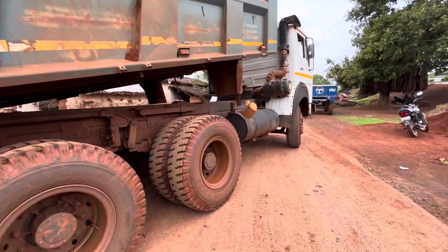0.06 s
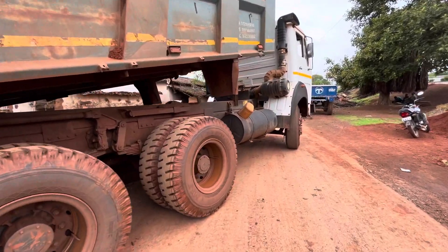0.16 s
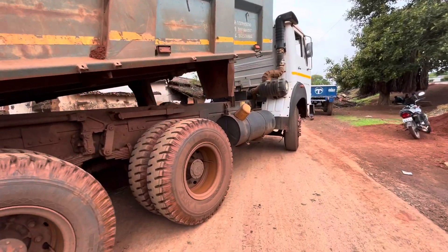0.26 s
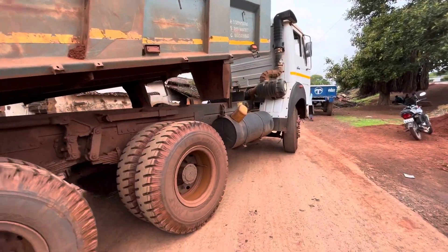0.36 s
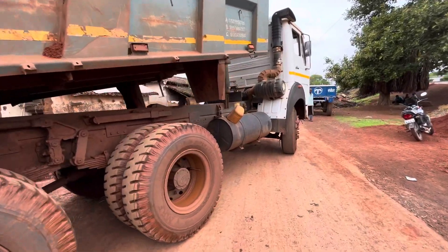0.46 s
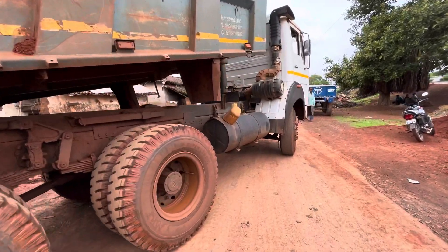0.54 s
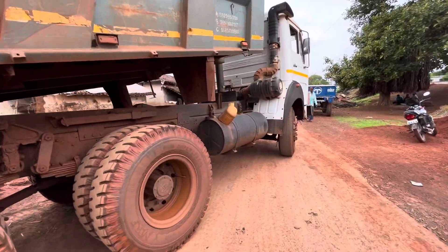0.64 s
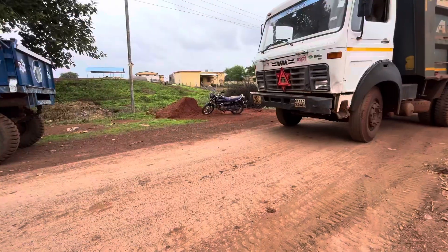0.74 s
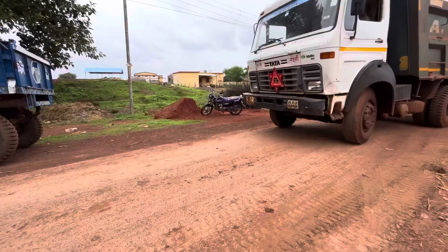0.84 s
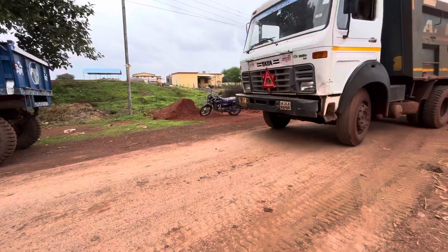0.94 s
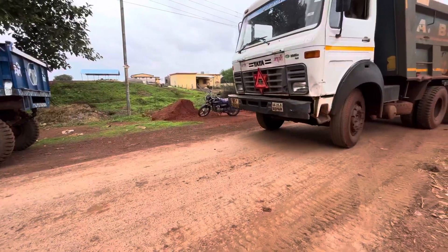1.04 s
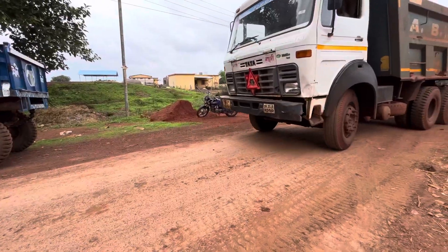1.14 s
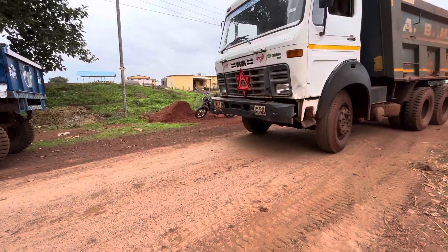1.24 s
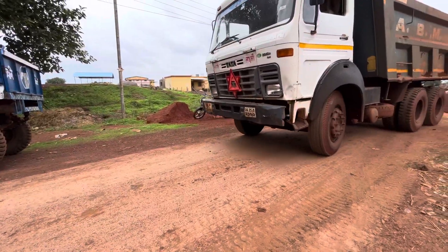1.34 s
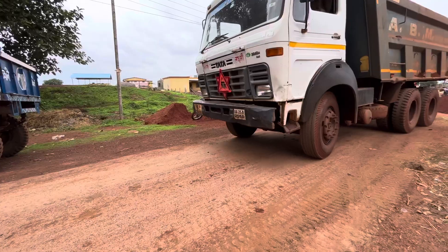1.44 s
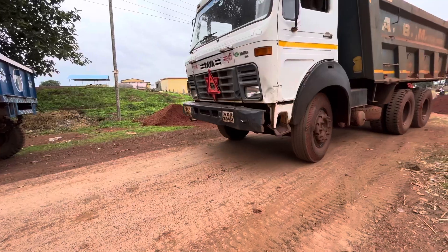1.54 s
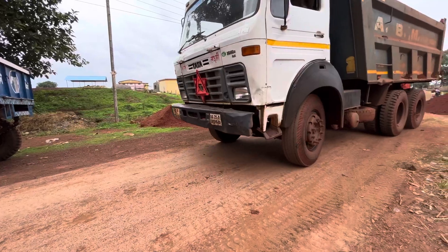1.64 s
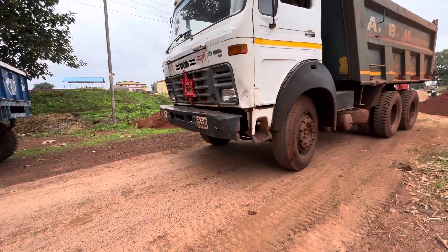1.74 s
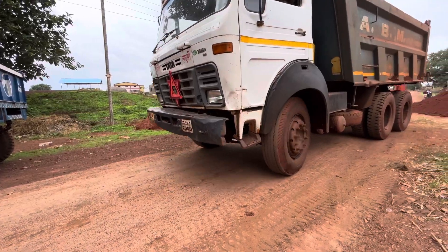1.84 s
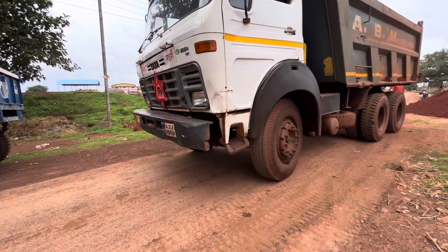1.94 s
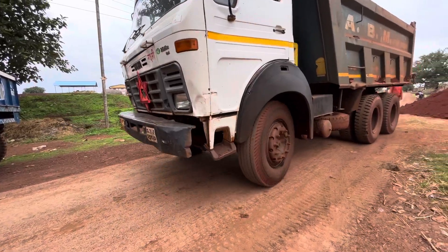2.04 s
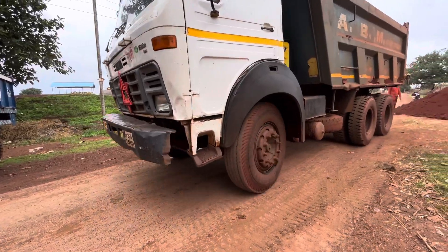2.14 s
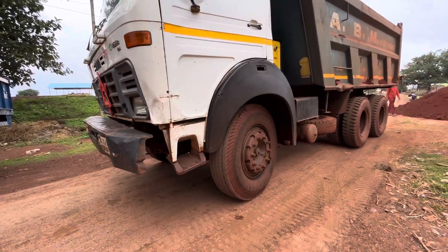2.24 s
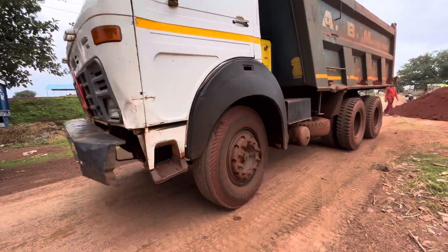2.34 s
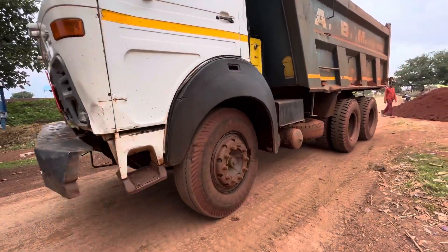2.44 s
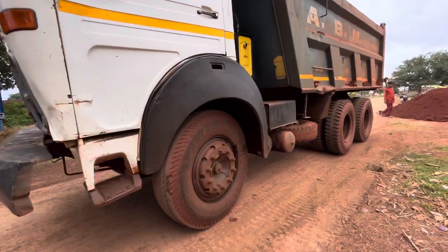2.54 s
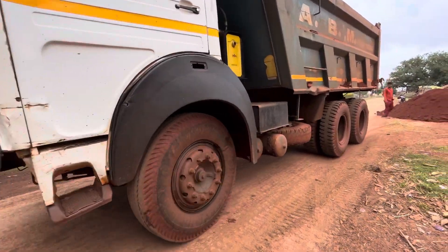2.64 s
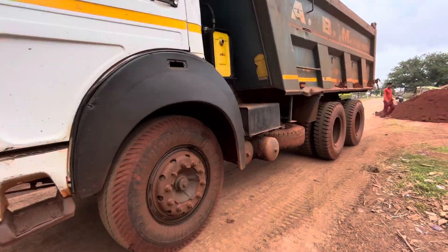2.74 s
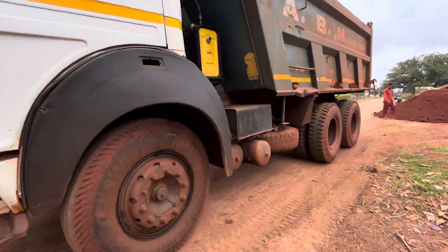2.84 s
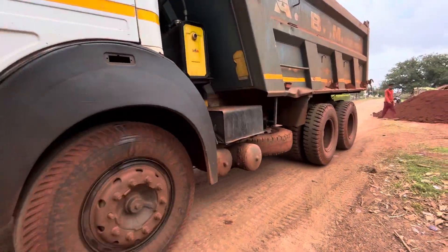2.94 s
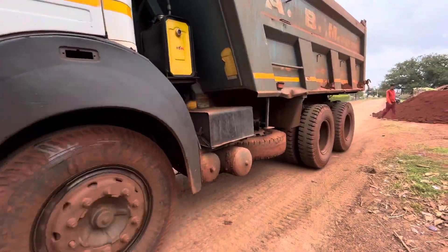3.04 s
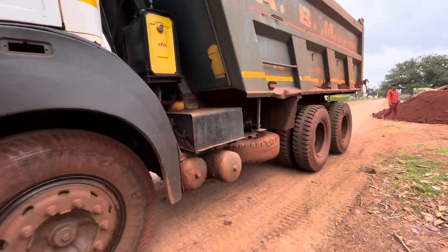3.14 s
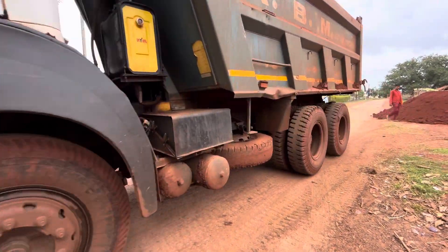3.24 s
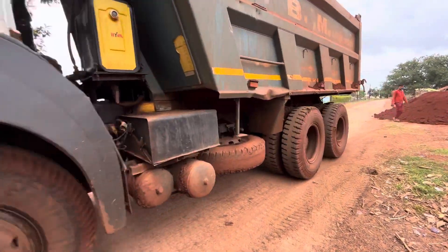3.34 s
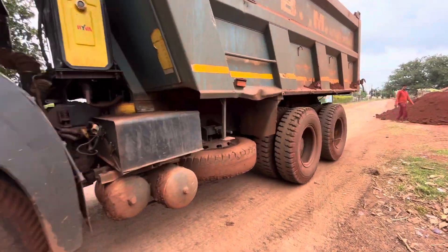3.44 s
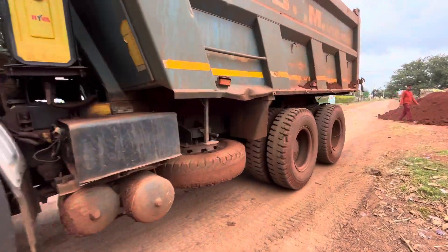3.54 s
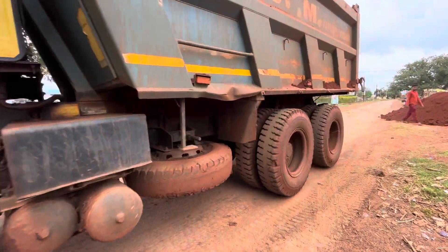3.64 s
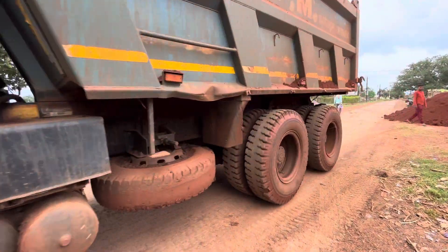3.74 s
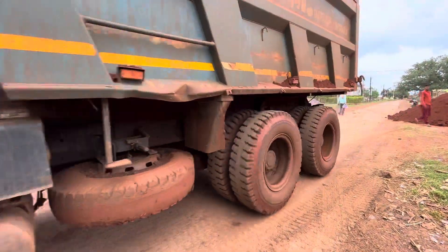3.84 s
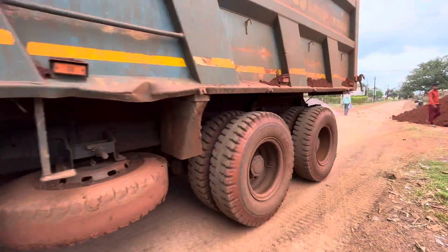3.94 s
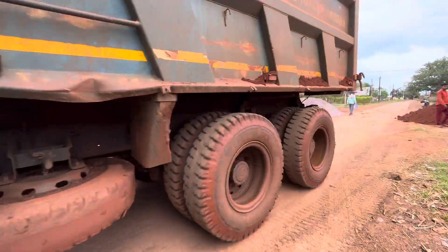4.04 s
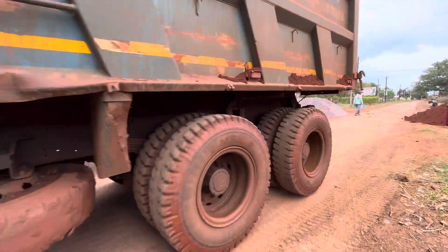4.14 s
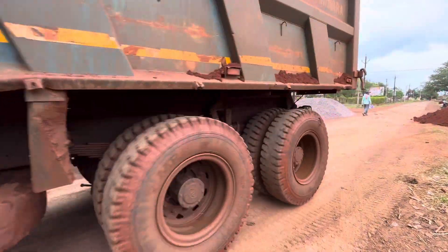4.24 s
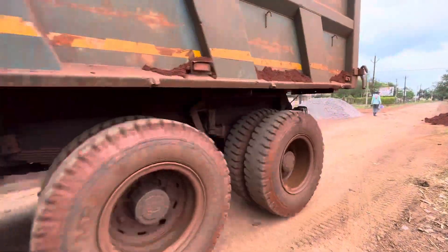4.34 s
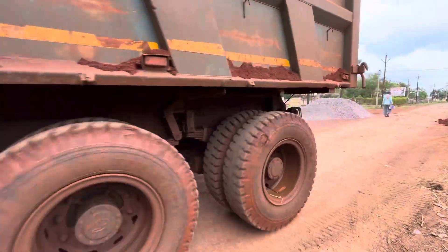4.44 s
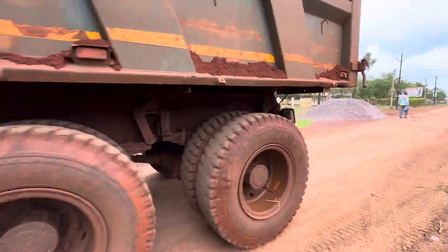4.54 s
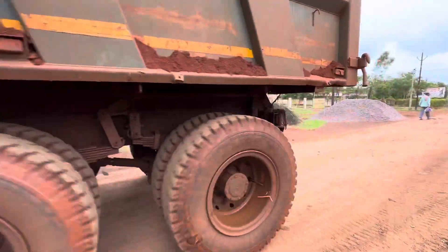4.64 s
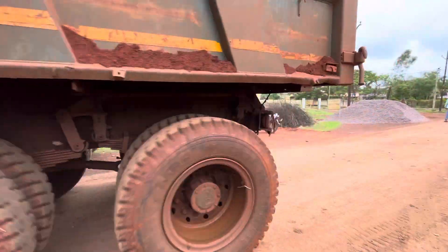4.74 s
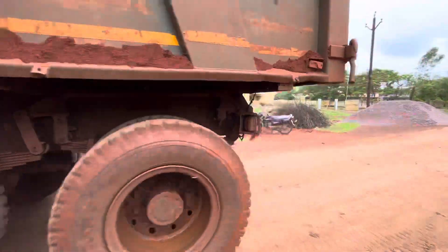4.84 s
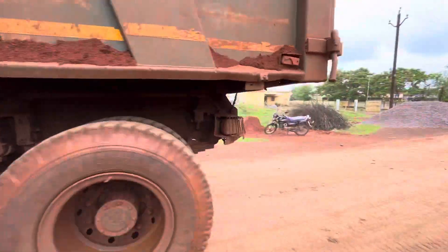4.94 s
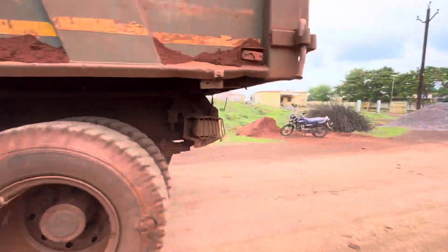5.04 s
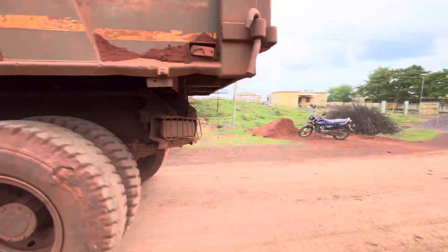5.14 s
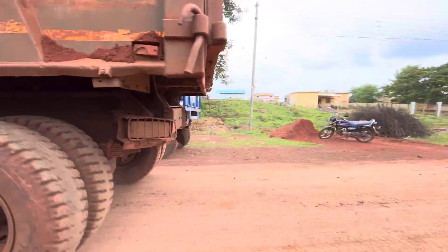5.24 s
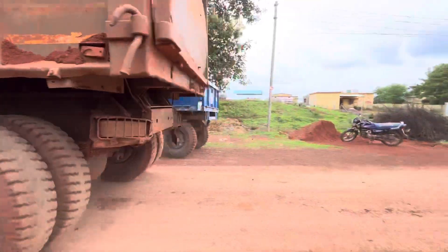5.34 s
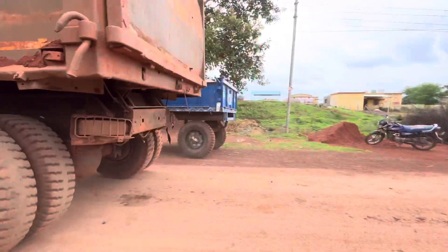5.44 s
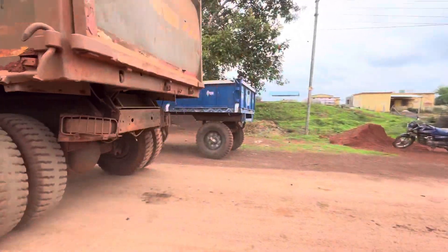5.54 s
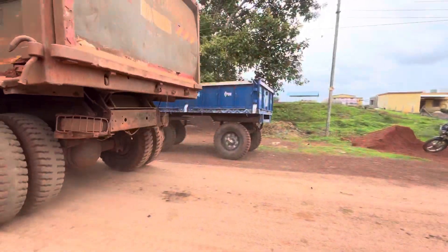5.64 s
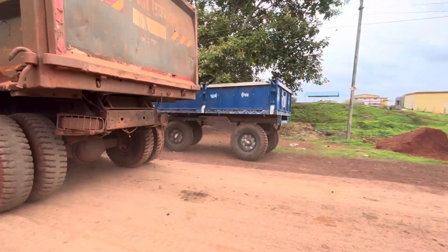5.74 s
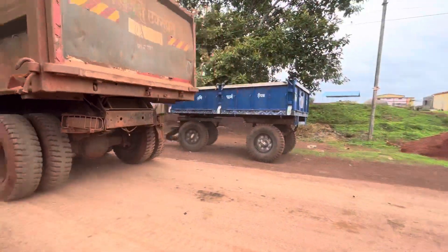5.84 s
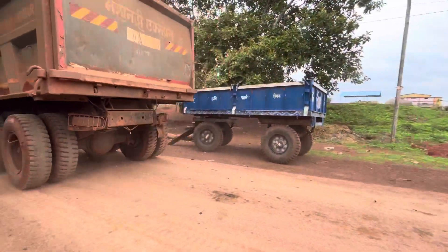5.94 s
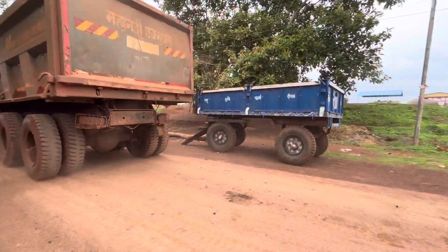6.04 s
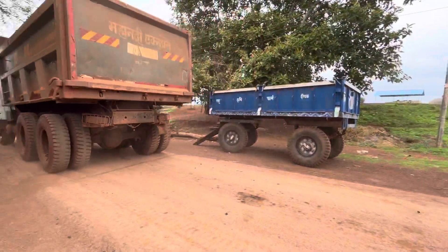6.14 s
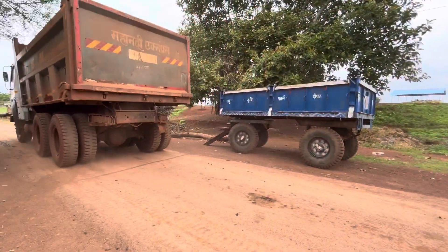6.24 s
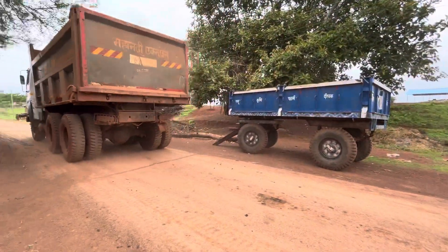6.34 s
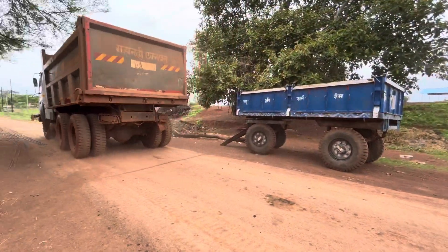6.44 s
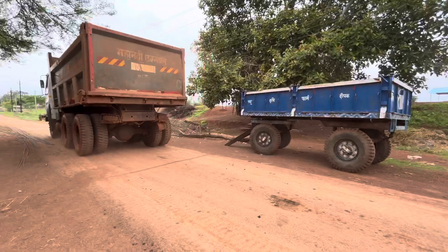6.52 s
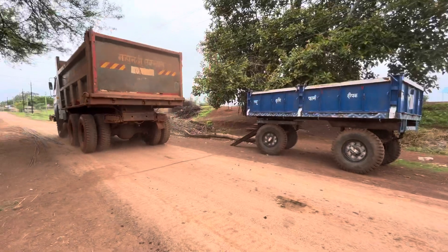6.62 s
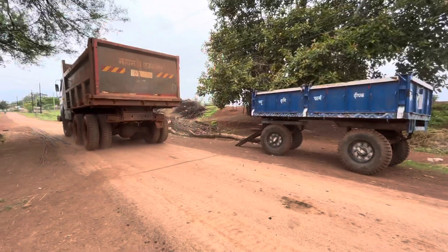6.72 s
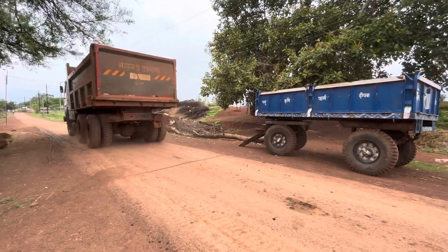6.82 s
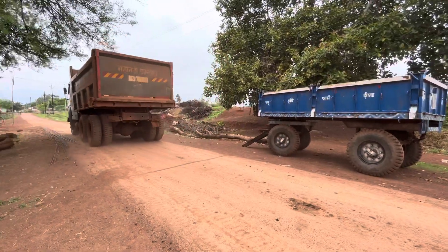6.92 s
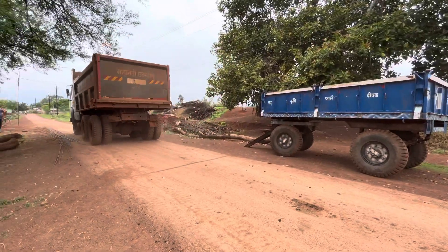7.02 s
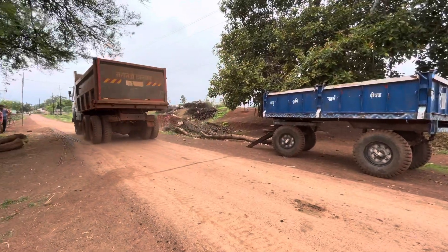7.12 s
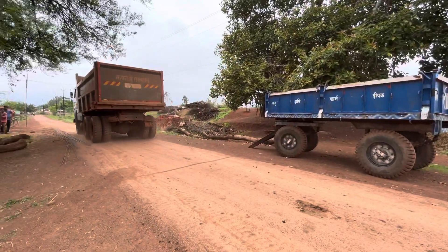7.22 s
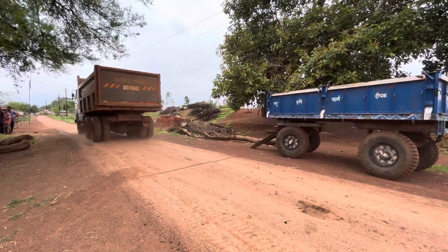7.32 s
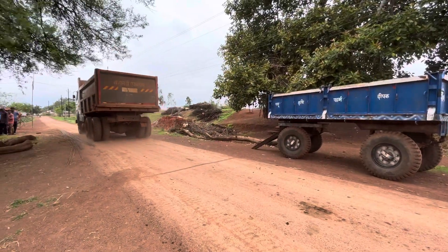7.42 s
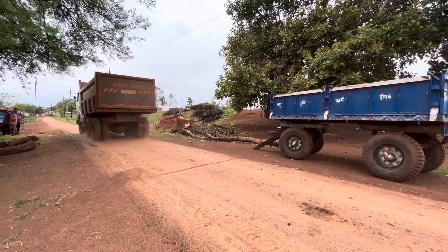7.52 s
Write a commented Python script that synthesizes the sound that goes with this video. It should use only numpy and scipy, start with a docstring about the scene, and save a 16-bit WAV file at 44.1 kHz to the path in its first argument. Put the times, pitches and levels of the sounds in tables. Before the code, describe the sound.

A close outdoor stereo microphone on a dirt road hears a heavy diesel truck. From 0 to 0.7 s it rolls away with throbbing low exhaust, muted clatter, soft compressor chuffs and a couple of dull thumps. At 0.7 s an abrupt cut: higher revs, quickly easing into a coasting run-down, with chattering gear whine, injector rasp and, around 1.5-2 s, a faint airy turbo whistle. Clatter grows as the pitch sinks until about 3 s; soft thumps near 2.5-2.8 s and a thin air hiss near 2.9 s. Throttle opens around 3.1 s, revs bottom near 3.6 s, then climb; from 3.5 to 4.3 s the open flank gives the loudest rough knocks, clanks, clatter and hiss. Bright hiss and deep exhaust boom peak at 4.3-5 s, with wind buffets and heavy dull thumps until 5.4 s. Then clatter drops away and a smoother droning exhaust recedes, pitch rising, to 7.6 s.

```python
"""Diesel dump truck passing on a dirt road

A six-cylinder truck rolls away; at 0.7 s the scene jumps to it approaching with the engine running down.
It then pulls past close by, revs rising, and recedes. Tones and pulsing noise make the exhaust, blows and
noise the clattering block, wavering tones the gear whine, shaped noise the hisses, rear tyres and wind.
Engine sounds follow one crankshaft; distance, revs, throttle and the side in view colour and level them."""
import sys
import numpy as np
from scipy.fft import rfft, irfft, next_fast_len
from scipy.io import wavfile
from scipy.ndimage import uniform_filter1d, map_coordinates

SR = 44100
rng = np.random.default_rng(int(sys.argv[2]) if len(sys.argv) > 2 else 0)


def dump_mix(stems):
    """Bounce the given channels to the path in sys.argv[1] as a 16-bit WAV at rate SR."""
    frames = np.atleast_2d(stems).T  # one column per channel
    limited = np.clip(frames, -1, 1)  # hard clip at full scale
    pcm = np.round(limited * 32767).astype(np.int16)
    wavfile.write(sys.argv[1], SR, pcm)


N = 334233

# engine speed: (time [s], firing rate [Hz])
FIRING_RATE = [(0, 60.1), (.69, 62.55), (.72, 93.5), (1.05, 100.2), (1.5, 88.74), (2, 76.08), (2.6, 61.69),
               (3.25, 51), (3.5, 41.81), (3.65, 39.42), (3.9, 45.03), (4.76, 58.27), (5.56, 63.59),
               (6.33, 70.23), (7.58, 84.93)]
# what each side lets out, front to tailgate; the flank is open:
# (block clatter [dB], injector rasp [dB], hiss [dB], knock [dB])
SIDE_LEVELS = [(-36.5, -35.5, -47.5, -45.5), (-34, -34.5, -45, -30), (-26, -26, -31, -33),
               (-36.5, -38.5, -45.5, -41), (-39.5, -44, -54, -45)]
# how the two ports differ in loudness: (frequency [Hz], left minus right [dB])
PORT_TILT = [(450, -10), (600, -0.5), (800, 5.5), (1300, 3.5), (2400, -2.5), (3600, 2), (5300, 8),
             (7000, -1.5), (9500, -6.5), (12000, 0.5)]
# right port behind the left, one entry for each side of the truck: lag [ms], before the bend below
PORT_LAG_MS = [0.0084, 0.21, 0.38, 0.39, 0.29]
# how that lag changes with pitch: (frequency [Hz], factor [1])
LAG_BEND = [(250, .2), (450, 3.5), (650, 2.02), (1000, 1.02), (2200, 0.7), (5000, 0.94), (6200, 0.96),
            (7000, 0)]
# colour of the combustion knock: (frequency [Hz], noise weight [dB])
KNOCK_COLOUR = [(500, -18), (780, -8.5), (1000, 1), (1150, 3), (1520, -2.5), (2000, -24), (3000, -16.5),
                (8000, -24), (14000, -70)]
# dull low thumps, levels before the thump and rattle gains: (time [s], boom [dB], rattle [dB])
LOW_THUMPS = [(.053, -12.5, -32), (.218, -17, -51), (2.49, -21, -54), (2.82, -17, -43), (4.95, -12, -48),
              (5.051, -21, -60), (5.186, -7, -35), (5.374, -14, -40), (5.417, -22, -36)]

CUT_S = .705  # the scene jumps back to the approach
SPEED_M_PER_S, SOUND_M_PER_S = 2.234, 343
ENGINE_PASS, OUTLET_PASS = (3.82, 1.99), (4.26, 1.59)  # closest approach: (time [s], distance [m])


def amp(db):
    """Turn decibels into gain."""
    return 10 ** (np.asarray(db) / 20)


def unit(x):
    """Scale x to an average (rms) strength of 1."""
    return x / np.sqrt(np.mean(x ** 2) + 1e-20)


def along(points, hz):
    """Read a curve of (Hz, value) points, with frequency on a log axis."""
    f, v = np.transpose(points)
    return np.interp(np.log(hz + 1), np.log(f + 1), v)


def clock():
    """Give the time of every sample in seconds."""
    return np.arange(N) / SR


def curves(rows):
    """Draw a line over time through each column after the time column."""
    s, *cols = np.transpose(rows)
    return [np.interp(clock(), s, c) for c in cols]


def wobble(rate):
    """Draw a smooth random curve with the given number of random points a second."""
    t = np.arange(0, N / SR + 1 / rate, .1 / rate)
    points = rng.standard_normal(int(N * rate / SR) + 4)
    return np.interp(clock(), t, map_coordinates(points, [t * rate]))


def swell(s, half):
    """Rise and fall like a bell around time s."""
    return np.exp(-.5 * np.minimum(((clock() - s) / half) ** 2, 100))


def eased(db):
    """Round off the steps of a level by averaging over 25 ms."""
    return uniform_filter1d(db, size=SR // 40)


def grid():
    """Give the frequencies of a spectrum padded with silence."""
    return np.fft.rfftfreq(next_fast_len(N + 8192, True) // 2 * 2, 1 / SR)


def filtered(x, response):
    """Multiply the spectrum of x by a response given on the grid."""
    m = 2 * (len(grid()) - 1)
    return irfft(rfft(x, m) * response, m)[..., :N]


def delayed(x, delay_s):
    """Hear x late by a changing delay."""
    return np.array([np.interp(clock() - delay_s, clock(), channel) for channel in x])


def pan(left_db):
    """Share a left-right difference in level between the two ports."""
    return amp(np.outer([.5, -.5], left_db))


def lift_db(modes, hz):
    """Add up how much a set of resonances raises each frequency."""
    return sum(db / (1 + (2 * (hz - centre) / width) ** 2) for centre, width, db in modes)


def opening():
    """Give 1 before the jump and 0 after it."""
    return 1.0 * (clock() < CUT_S)


def emerging_db():
    """Before the jump the engine grows louder as it clears the rear wheels."""
    rise_db_per_s = 7.5
    return rise_db_per_s * (clock() - CUT_S / 2)


def pass_time():
    """Tell how far along its pass the truck is, in seconds."""
    ahead_s = 5.06  # before the jump the truck is this much further along
    return clock() + ahead_s * opening()


def distance(closest):
    """Give the metres to a part of the truck as it rolls by in a straight line."""
    s, metres = closest
    return np.hypot(metres, SPEED_M_PER_S * (pass_time() - s))


def facing():
    """Tell which side of the truck is turned to the microphones."""
    # (time along the pass [s], side [0 front, 1 cab corner, 2 flank, 3 rear wheels, 4 tailgate])
    side_points = [(.72, 0), (2.3, 1), (3.3, 0.99), (3.5, 2), (3.97, 2), (4.9, 3), (5.8, 3.5), (6.5, 4)]
    return np.clip(np.interp(pass_time(), *np.transpose(side_points)), 0, len(SIDE_LEVELS) - 1)


def throttle():
    """Give 0 while the engine coasts and near 1 while it pulls."""
    # pedal: (time [s], opening [0 coasting to 1 pulling])
    pedal = [(.78, 1), (.95, 0.16), (3.07, 0), (3.12, 0.97)]
    return np.clip(curves(pedal)[0], 0, 1)


def carry_db(closest):
    """A part of the engine is louder the nearer it is and the faster it turns."""
    rev_db_per_octave = 12.5
    octaves = np.log2(curves(FIRING_RATE)[0] / 60)
    return rev_db_per_octave * octaves + 20 * np.log10(closest[1] / distance(closest))


def machinery_db():
    """Set clatter, rasp, hiss and knock levels from distance, revs, throttle and the side in view."""
    # change before the jump, one entry each for clatter, rasp, hiss and knock: level [dB]
    opening_levels = (-7, -7.5, -10, -16)
    load_db = 3  # extra with the throttle open
    shared, side = carry_db(ENGINE_PASS) + load_db * throttle(), facing()
    levels = []
    for by_side, db in zip(np.transpose(SIDE_LEVELS), opening_levels):
        side_db = np.interp(side, np.arange(len(by_side)), by_side)
        levels.append(eased(shared + side_db + (db + emerging_db()) * opening()))
    return levels


def underbody(echo=0.53, decay_s=0.0094, dull_hz=6000):
    """Quick echoes between dirt road, frame and panels ripple the response; they weaken in the treble."""
    hz, t = grid(), np.arange(SR // 20) / SR
    tail = rng.standard_normal(len(t)) * np.exp(-t / decay_s)
    depth = echo / (1 + (hz / dull_hz) ** 2)
    return (1 + depth * rfft(tail / np.linalg.norm(tail), 2 * (len(hz) - 1))) / np.hypot(1, depth)


def ports(direct, lag_ms):
    """Two ports hear the direct sound with a lag, and scattered sound that is unrelated between them."""
    # (frequency [Hz], left-right likeness [0-1])
    likeness = [(500, 1), (1000, 0.46), (2500, 0.39), (5000, 0.16), (14000, 0.13)]
    hz = grid()
    gain = pan(along(PORT_TILT, hz))
    lead = 2 * np.pi * hz * lag_ms / 1000 * along(LAG_BEND, hz)
    path = gain * np.exp(1j * np.outer([.5, -.5], lead))
    alike = np.clip(along(likeness, hz), .3, .85)
    # strength of the two ports' average, divided out to keep the colour even
    middle = np.sqrt(alike * abs(path.mean(0)) ** 2 + (1 - alike) * (gain ** 2).mean(0) / 2)
    scattered = rfft(rng.standard_normal((2, N)), 2 * (len(hz) - 1))
    both = direct * path * np.sqrt(alike) + scattered * gain * np.sqrt(1 - alike)
    return underbody() * both / middle


def wind(lumps_db=3, eddy_db=4.5, eddies_per_s=9):
    """Strong gusts and the truck's eddying wake buffet each port with low noise of its own."""
    # strongest gusts: (time [s], level before lumps and left-right gains [dB], half length [s])
    gusts = [(0.62, -30, 0.051), (0.835, -31, 0.037), (2.474, -27, 0.063), (2.622, -30, 0.047),
             (2.745, -26.5, 0.14), (3.82, -24, 0.083), (4.847, -21, 0.069), (4.973, -19.5, 0.051),
             (5.202, -20, 0.086), (5.407, -22, 0.052), (5.58, -26.5, 0.073), (5.795, -25.5, 0.044),
             (5.987, -27, 0.061), (6.305, -31.5, 0.056)]
    # (frequency [Hz], noise weight [dB])
    wind_colour = [(20, -40), (50, 2), (110, 2), (200, -1.5), (330, -3.5), (480, -18.5), (900, -34.5),
                   (1500, -21), (2500, -68), (6000, -100)]
    wake_db, wake_s, wake_half_s = -30.5, 4.65, 0.96
    wake = amp(wake_db + eddy_db * wobble(eddies_per_s)) * swell(wake_s, wake_half_s)
    force = np.sqrt(wake ** 2 + sum((amp(db) * swell(s, half)) ** 2 for s, db, half in gusts))
    lumps = amp(lumps_db * np.array([wobble(45), wobble(45)]))
    noise = filtered(rng.standard_normal((2, N)), amp(along(wind_colour, grid())))
    return force * unit(lumps * noise) * amp([[2.5], [-.5]])


def high_hiss():
    """High hiss swells and fades: the fan behind the grille, then the rear tyres twice."""
    # (time [s], level [dB], half length [s], left minus right [dB])
    hiss_swells = [(2.3, -43.5, .25, 3), (4.55, -35, 0.3, -10), (5.97, -48.5, 0.25, 0)]
    # (frequency [Hz], noise weight [dB])
    hiss_colour = [(1000, -16), (2000, -6), (4500, 9), (6500, -5), (9000, -3), (14000, -21)]
    colour = amp(along(hiss_colour, grid())) * pan(along(PORT_TILT, grid()))
    noise = unit(filtered(rng.standard_normal((2, N)), colour))
    return sum(amp(db) * swell(s, half) * pan(left_db) for s, db, half, left_db in hiss_swells) * noise


def thumps(level_db=-2, delay_s=0.00396):
    """Dull low thumps, from wind buffets or the body: single blows ring a few resonances."""
    # resonances of a thump: (frequency [Hz], width [Hz], weight [dB])
    thump_modes = [(222, 90, -2), (344, 76, -7), (697, 15, -35), (1000, 66, -17), (1170, 45, -21)]
    hz, blows, tone = grid(), np.zeros(N), 0
    for k, (centre, width, db) in enumerate(thump_modes):
        damping = 1j * hz * width
        tone = tone + (-1) ** k * amp(db) * damping / (centre * centre - hz * hz + damping)
    for s, db, _ in LOW_THUMPS:
        blows[round((s + delay_s) * SR)] = amp(db + level_db)
    soft = tone / (1 + 1j * hz / 900) ** 2
    return filtered(blows, soft / abs(irfft(soft)).max())


def rattles(rough_db=3.0, left_db=3):
    """A dull rattle of rough noise starts just before each thump and dies away."""
    # (frequency [Hz], noise weight [dB])
    rattle_colour = [(150, -20), (330, 9), (600, -1), (900, -3), (1500, -10.5), (2200, -16), (8000, -49)]
    lead_s, attack_s, decay_s = 0.029, 0.007, 0.055
    level = np.zeros(N)
    for s, _, db in LOW_THUMPS:
        age = np.maximum(clock() - s + lead_s, 0)
        level += amp(db) * (1 - np.exp(-age / attack_s)) * np.exp(-age / decay_s)
    shake = rng.standard_normal(N) + .5 * rng.standard_normal((2, N))
    clatter = unit(filtered(shake * amp(rough_db * wobble(120)), amp(along(rattle_colour, grid()))))
    return 2 * level * clatter * amp([[left_db / 2], [-left_db / 2]])


def air(chuff_hz=2450):
    """The air compressor chuffs softly early on, and an air valve gives short thin hisses, all from noise."""
    # compressor strokes: (time [s], level before an 8 dB cut [dB])
    chuff_strokes = [(0.1794, -36), (0.2828, -36), (0.3825, -34), (0.4944, -36), (0.5985, -32)]
    # air valve: (time [s], level [dB], half length [s])
    valve_hisses = [(2.94, -43, 0.044), (3.55, -45, .07)]
    hz = grid() + 1
    strokes = sum(amp(db - 8) * swell(s, .01) for s, db in chuff_strokes)
    chuff = unit(filtered(rng.standard_normal((2, N)), 1 / (1 + (4 * np.log(hz / chuff_hz)) ** 2)))
    thin = amp(along([(5000, -40.5), (9500, 20), (14000, 16)], hz))
    leak = unit(filtered(rng.standard_normal((2, N)), thin))
    return strokes * chuff + sum(amp(db) * swell(s, half) for s, db, half in valve_hisses) * leak


def turbo(blur_hz=420):
    """The turbocharger spins down with a faint whistle, made airy by random wavering."""
    # (time [s], pitch [Hz], level [dB])
    whistle = [(.72, 9400, -75), (1.1, 9400, -64), (1.45, 9300, -55), (1.85, 8897, -54), (2.1, 8500, -56),
               (2.5, 7900, -80)]
    hz, db = curves(whistle)
    phase = 2 * np.pi * np.cumsum(hz) / SR
    pair = [wobble(blur_hz) * np.sin(phase) + wobble(blur_hz) * np.cos(phase) for port in range(2)]
    return amp(db) * unit(np.array(pair))


def whine(cycles, stray=.45, stray_hz=40):
    """The meshing gear teeth sing as thin, unsteady lines that follow the revs."""
    # clear whines: (multiple of the firing rate [1], level relative to the whine's own [dB])
    mesh_lines = [(11.8, 0), (12.75, -4), (15.7, -7), (21.6, -5), (23.6, 0)]
    mesh_db, mesh_s, mesh_half_s = -44, 2.08, .42  # they carry as the grille draws near
    out = np.zeros((2, N))
    lag = np.array([[0], [PORT_LAG_MS[0] + PORT_LAG_MS[1]]]) / 2000 * curves(FIRING_RATE)[0]
    for order, db in mesh_lines:
        unsteady = 1 + stray * np.array([wobble(stray_hz) + 1j * wobble(stray_hz) for port in range(2)])
        out += amp(db) * unit((unsteady * np.exp(2j * np.pi * order * (cycles - lag))).real)
    return amp(mesh_db) * swell(mesh_s, mesh_half_s) * out


def gears(cycles, lower_order=11.7, upper_order=23.5, blur_hz=260, blur=1.0, spread=0.36):
    """Unloaded timing gears chatter with the engine cycle: fuzzy, stranded whines that follow the revs."""
    # (time [s], lower mesh level [dB], upper mesh level [dB])
    mesh_levels = [(.68, -72, -57), (.75, -42.5, -39), (1.1, -41, -39), (1.45, -60, -55), (1.85, -47, -40),
                   (2.2, -41, -45), (2.6, -47, -55), (3.1, -77, -43), (3.6, -72, -66)]
    out = np.zeros((2, N))
    for order, db in zip((lower_order, upper_order), curves(mesh_levels)):
        pattern = rng.standard_normal(size=14) + 1j * rng.standard_normal(size=14)
        # the same pattern comes round every six firings
        backlash = np.interp(cycles / 6, np.arange(len(pattern)) / len(pattern), pattern, period=1)
        chatter = backlash + blur * wobble(blur_hz) + spread * 1j * np.outer([1, -1], wobble(blur_hz))
        out += amp(db) * unit((chatter * np.exp(2j * np.pi * order * cycles)).real)
    return out


def growl(cycles, throb=0.49, left_db=2):
    """Low noise in narrow bands, throbbing at the firing rate, swells up; one of the swells is a gust."""
    # (time [s], level [dB], half length [s], centre [Hz], width [Hz])
    growl_swells = [(.2, -31, 0.2, 229, 130), (.4, -29.5, 0.25, 135, 90), (2.312, -35.5, 0.045, 213, 40),
                    (2.45, -28, 0.065, 160, 110), (3.8, -28.5, 0.16, 307, 80),
                    (4.357, -27.5, 0.034, 150, 100)]
    out = np.zeros(N)
    for s, db, half, centre_hz, width_hz in growl_swells:
        gulps = rng.standard_normal(N) * (1 + throb * np.cos(2 * np.pi * cycles))
        narrow = 1 / (1 + (2 * (grid() - centre_hz) / width_hz) ** 2)
        out += amp(db) * swell(s, half) * unit(filtered(gulps, narrow))
    return out * amp([[left_db / 2], [-left_db / 2]])


def impacts(cycles, count, scatter_db, jitter_s):
    """Blows at set crank angles come round every six firings, never quite alike."""
    angle = 6 * (np.arange(count) + rng.uniform(-.3, .3, count)) / count
    size = rng.standard_normal(count)
    turns = np.arange(0, cycles[-1], 6)[:, None] + angle
    when = np.interp(turns, cycles, clock(), right=2 * N / SR) + jitter_s * rng.standard_normal(turns.shape)
    sizes = np.sign(size) * amp(scatter_db * rng.standard_normal(turns.shape)) * (.5 + abs(size))
    return unit(np.bincount(abs(when * SR).astype(int).ravel(), sizes.ravel(), N)[:N])


def rumble(cycles, steady=0.55, throb=0.19, side_db=-5, left_db=1.5, lumps_db=1.5):
    """Unequal cylinders fill the pipe with lines at sixths of the firing rate, over puffs of rough gas."""
    # exhaust rumble: (time [s], level before random lumps [dB])
    rumble_level = [(0, -38.5), (.08, -22.5), (.69, -33.5), (1, -36), (2.2, -35.5), (3.1, -36), (3.6, -25),
                    (4.1, -23.5), (4.7, -29), (5.2, -31), (5.7, -41.5), (6.4, -40), (7.58, -36)]
    # colour of the exhaust pipe: (frequency [Hz], weight [dB])
    pipe_colour = [(25, -26), (45, -6), (80, -0.5), (130, -4.5), (220, -5.5), (320, -5), (390, -10.5),
                   (550, -22), (800, -28), (2000, -110)]
    pipe = amp(along(pipe_colour, grid()))
    uneven = unit(filtered(impacts(cycles, count=24, scatter_db=1.0, jitter_s=0.00022), pipe))
    gas = filtered(rng.standard_normal((2, N)) * (1 + throb * np.cos(2 * np.pi * cycles)), pipe)
    mid = unit(steady * uneven + (1 - steady) * unit(gas[0]))
    side = amp(side_db) * unit(gas[1])
    level = amp(curves(rumble_level)[0] + lumps_db * wobble(16))
    return level * np.array([mid + side, mid - side]) * amp([[left_db / 2], [-left_db / 2]])


def shielded(x, loss_db=-4, edge_hz=170):
    """From straight ahead the truck's bulk hides some of the exhaust's bass."""
    bass = filtered(x, 1 / (1 + (grid() / edge_hz) ** 4))
    return x + (amp(loss_db * eased(np.clip(2 - 2 * facing(), 0, 1))) - 1) * bass


def drone(cycles, shake_db=0.0, rough_db=2.5, waver_db=2.5, left_db=4.0):
    """The exhaust gives tones at multiples of the firing rate that swell in the pipe's resonances."""
    # (multiple of the firing rate [1], level [dB], extra before the jump [dB],
    #  extra behind the tailgate [dB], level in the boom beside the outlet [dB])
    exhaust_tones = [(1, -29, -0.5, 1, -17.5), (1.5, -47, -1, 17, -55), (2, -36.5, 0, 9.5, -49),
                     (3, -45.5, -1, 3.5, -35), (4, -47, 4, 14, -47)]
    # pipe resonances: (frequency [Hz], width [Hz], lift [dB])
    pipe_modes = [(81.4, 7.2, 4), (154, 15.5, 5.3), (164.2, 17, 6.2), (182.5, 8.5, 5.9)]
    # a tone hums out as it meets a resonance of intake, cab or pipe:
    # (time [s], multiple of the firing rate [1], level before roughness [dB], half length [s])
    hum_swells = [(.09, 1, -27, .06), (.24, 3, -29, .06), (0.397, 2, -26.5, .07), (0.557, 2, -28.5, 0.11),
                  (.77, 1, -35.5, .06), (0.898, 3, -31, .035), (1.064, 3, -32, 0.037), (1.19, 3, -39, .03),
                  (1.39, 3, -33.5, 0.053), (1.55, 3, -33, 0.1), (1.85, 4, -43, 0.064), (2.13, 1, -38, .09),
                  (2.258, 4, -42, 0.054), (2.62, 1, -32, .08), (3.66, 2, -26.5, 0.11), (3.65, 1, -29, .09),
                  (4.08, 2, -27.5, 0.18), (4.2, 3, -27, 0.066), (4.876, 3, -26.5, .14), (6, 1, -33.5, .2),
                  (7.14, 1, -30.5, .11), (7.3, 1.5, -33, .2), (7.449, 3, -40, .12)]
    # the tailpipe comes to point at the microphones: (time [s], amount [0-1])
    pipe_aim = [(5.9, 0), (7.3, 0.94)]
    coast_db = -18  # change with the throttle shut
    boom_full_s, boom_end_s = 4.25, 4.98  # the deep boom beside the outlet
    boom_rise_db_per_s, boom_fall_db_per_s = 25, 192
    t, firing_hz = clock(), curves(FIRING_RATE)[0]
    behind = curves(pipe_aim)[0]
    settled = 1 - .75 * behind  # tones are steadier from behind
    shared = carry_db(OUTLET_PASS) + coast_db * (1 - throttle())
    before_db = boom_rise_db_per_s * np.maximum(boom_full_s - t, 0)
    after_db = boom_fall_db_per_s * np.maximum(t - boom_end_s, 0)
    boom = amp(-before_db - after_db)
    tones = np.zeros(N)
    for multiple, db, opening_db, behind_db, boom_db in exhaust_tones:
        k = round(2 * multiple) / 2
        aim_db = (opening_db + emerging_db()) * opening() + behind_db * behind
        pipe_db = lift_db(pipe_modes, k * firing_hz)
        own = amp(eased(db + shared + aim_db + pipe_db + waver_db * settled * wobble(5)))
        hums = sum((amp(hum_db) * swell(s, half)) ** 2
                   for s, order, hum_db, half in hum_swells if round(2 * order) / 2 == k)
        rough = amp((shake_db if k == 1 else rough_db) * settled * wobble(25))
        level = np.sqrt((own + amp(boom_db) * boom) ** 2 + hums) * rough
        tones += level * np.sin(2 * np.pi * (k * cycles + rng.random()))
    return np.sqrt(2) * tones * amp([[left_db / 2], [-left_db / 2]])


def hard_knocks(t60_s=.055, attack_s=.0012, clank=.4, width_hz=90):
    """Now and then combustion hits hard enough to ring the labouring block: a short, rough clank."""
    # (time [s], ring level before clank and port gains [dB], ring pitch [Hz])
    hard_hits = [(3.512, -18, 1300), (3.58, -17, 1170), (3.686, -17, 930), (3.856, -17, 1510),
                 (3.944, -16, 940), (4.032, -16, 1250), (4.058, -16, 930), (4.12, -17, 1010),
                 (4.18, -15, 935), (4.216, -18, 1100), (4.271, -19, 1140), (4.303, -13, 965)]
    out = np.zeros((2, N))
    metal = unit(filtered(rng.standard_normal((2, N)), amp(along(KNOCK_COLOUR, grid()))))
    spread = np.array([wobble(width_hz), wobble(width_hz)])
    age = np.arange(SR // 10) / SR
    lag_s = np.array([[0], [PORT_LAG_MS[2] / 1000]])
    for s, db, hz in hard_hits:
        span = slice(round(s * SR), round(s * SR) + len(age))
        ring = np.sin(2 * np.pi * (hz * (age - lag_s) + rng.random()) + .5 * spread[:, span])
        envelope = amp(db - 60 * age / t60_s) * (1 - np.exp(-age / attack_s))
        out[:, span] += envelope * (ring + clank * metal[:, span])
    return out * pan(along(PORT_TILT, np.array([1000])))


def knock(cycles, level_db, decay_s=.009, scatter_db=1.5, muffled=.25, bare=.8):
    """With the throttle open combustion roars; beside the open flank each firing cracks out unevenly."""
    hz, firing = grid(), cycles.astype(int)
    age_s = (cycles - firing) / curves(FIRING_RATE)[0]
    burst = unit(amp(scatter_db * rng.standard_normal(N))[firing] * np.exp(-age_s / decay_s))
    crack = np.interp(facing(), [1, 2, 4], [muffled, bare, muffled])
    roar = irfft(ports(rfft(rng.standard_normal(N), 2 * (len(hz) - 1)), PORT_LAG_MS[2]))[:, :N]
    ring = filtered(np.sqrt(1 - crack + crack * burst ** 2) * roar, amp(along(KNOCK_COLOUR, hz)))
    return throttle() * amp(level_db) * ring / ring.mean(0).std()


def engine(cycles, band_db, rattle=0.77, pulse=0.072, lope=0.044, flutter_db=(1.1, .6, .55), drift_db=0.79,
           low_hz=550, mid_hz=1900, high_hz=6000):
    """Valves and injectors rattle the block amid rushing air; each side of the truck has its own colour."""
    # colours of the machinery from each side, all: (frequency [Hz], weight [dB])
    front_colour = [(260, -38), (450, 11.5), (491, -8), (560, -9), (630, -13), (700, 2), (790, 1),
                    (1130, -6), (1750, 1), (2070, -10), (2340, 2), (2600, -1.5), (2950, -0.5), (3200, -5.5),
                    (3600, -6.5), (5340, -14.5), (7990, -29.5), (9360, -26.5), (14000, -29)]
    corner_colour = [(260, -40), (450, 6), (560, -11), (630, -12), (700, -6.5), (790, -2.5), (950, -3),
                     (1400, -6.5), (1900, -7), (2350, -7), (2680, -9), (3520, -6), (4900, -9),
                     (6260, -20.5), (8340, -21.5), (11100, -21), (14000, -26.5)]
    flank_colour = [(260, -34), (450, 9), (617, -12), (847, -3), (951, -1), (1530, -1.5), (1670, -10),
                    (2070, -13.5), (2800, -8.5), (3370, -10.5), (5120, -12), (6920, -15), (7760, -9.5),
                    (12000, -18.5), (14000, -23)]
    wheels_colour = [(260, -31), (450, 2), (583, -18.5), (911, -13.5), (1070, -10.5), (1690, -17),
                     (2840, -6.5), (3370, -13), (5190, -11), (6630, -21.5), (8220, -18), (11600, -24),
                     (13000, -30), (14000, -44)]
    rear_colour = [(260, -49), (450, -22), (512, -26), (645, -18), (713, -8), (830, -3.5), (1040, -2),
                   (1210, -6), (1380, -18.5), (1640, -11), (2160, -17), (2680, -11), (2950, -13),
                   (3730, -17), (5000, -21.5), (5420, -20.5), (5910, -27), (14000, -33)]
    # block and chassis resonances: (frequency [Hz], width [Hz], lift [dB])
    block_modes = [(746, 78, 2.5), (987, 190, 2), (1190, 66, -3), (2780, 350, 1), (3620, 130, 1.5),
                   (4100, 840, 1.5), (5000, 320, 2.5), (8760, 900, -0.5), (9300, 500, 1.5)]
    hz, side = grid(), facing()
    blows = rattle * impacts(cycles, count=96, scatter_db=1.5, jitter_s=.00003)
    direct = rfft(unit(blows + rng.standard_normal(N)), 2 * (len(hz) - 1))
    rings = lift_db(block_modes, hz)
    # three bands: clatter, rasp and hiss
    above = [1 / np.sqrt(1 + (edge / (hz + 1)) ** 16) for edge in (low_hz, mid_hz, high_hz)]
    bands = [above[0] * np.sqrt(1 - above[1] ** 2), above[1] * np.sqrt(1 - above[2] ** 2), above[2]]
    levels = [amp(db + depth * wobble(30) + drift_db * wobble(10)) for db, depth in zip(band_db, flutter_db)]
    colours = (front_colour, corner_colour, flank_colour, wheels_colour, rear_colour)
    out = np.zeros((2, N))
    for k, (colour, lag_ms) in enumerate(zip(colours, PORT_LAG_MS)):
        pair = ports(direct, lag_ms) * amp(along(colour, hz) + rings)
        share = np.sqrt(np.clip(1 - abs(side - k), 0, 1))  # neighbouring sides blend at equal power
        for band, level in zip(bands, levels):
            part = irfft(pair * band)[:, :N]
            out += part * (share * level / part.mean(0).std())
    cycle = np.pi * cycles / 3  # one turn every six firings
    return out * (1 + pulse * np.cos(2 * np.pi * cycles) + lope * np.cos(cycle))


def road(x):
    """The road's reflection lags more as the truck nears, so its comb of peaks slides; it fades by the flank."""
    engine_height_m, mic_height_m, bounce = 0.914, 0.93, 0.1
    delay_s = 2 * engine_height_m * mic_height_m / distance(ENGINE_PASS) / SOUND_M_PER_S
    strength = bounce * np.clip(2 - facing(), 0, 1)
    return (x + strength * delayed(x, delay_s)) / np.hypot(1, strength)


def panels(x, echo=0.17, gap_m=1.3):
    """An echo off the side panels lags most with the engine abreast, so its ripple slides; it is gone astern."""
    delay_s = 2 * gap_m * ENGINE_PASS[1] / distance(ENGINE_PASS) / SOUND_M_PER_S
    strength = echo * np.clip(3.5 - facing(), 0, 1)
    return (x + strength * delayed(x, delay_s)) / np.hypot(1, strength)


def placed(x, clatter_swing=1.53, clatter_hz=1500, rasp_hz=6500):
    """The machinery shifts between left and right as it moves, the clatter most and the hiss not at all."""
    # where the engine lies: (time [s], left minus right before the clatter's swing [dB])
    bearing = [(0, -1), (.69, -2.5), (.72, -4), (1.1, -2.5), (2.6, 1.4), (4.2, 1), (4.8, -1), (5.4, -1),
               (5.8, 0.5), (7.58, -.5)]
    turn_ms = 0.25  # before the jump the ports face along the truck, which shortens the lag between them
    hz = grid()
    turn = np.outer([.5, -.5], hz * along(LAG_BEND, hz)) * turn_ms / 1000
    x = np.where(opening() > 0, filtered(x, np.exp(-2j * np.pi * turn)), x)
    clatter, body = [filtered(x, 1 / (1 + (hz / edge) ** 8)) for edge in (clatter_hz, rasp_hz)]
    left_db = curves(bearing)[0]
    return clatter * pan(clatter_swing * left_db) + (body - clatter) * pan(left_db) + x - body


def scene():
    """One crankshaft, its speed slightly unsteady, drives the engine sounds; the rest is laid around them."""
    cycles = np.cumsum(curves(FIRING_RATE)[0] * (1 + .002 * wobble(12))) / SR  # firings so far
    *band_db, knock_db = machinery_db()
    lows = wind() + thumps() + rattles()
    lows = lows + growl(cycles) + shielded(rumble(cycles)) + drone(cycles)
    machinery = air() + turbo() + whine(cycles) + gears(cycles)
    machinery = machinery + hard_knocks() + knock(cycles, knock_db)
    machinery = machinery + panels(road(engine(cycles, band_db)))
    shade_db, shade_s, shade_half_s = 4, 2.75, .35  # the low sounds lean left as the cab goes by
    shade = amp(-shade_db * np.outer([0, 1], swell(shade_s, shade_half_s)))
    return high_hiss() + lows * shade + placed(machinery)


def record(dry):
    """The microphones drop the deepest bass and keep nothing above their band limit."""
    top_hz = 14400
    hz = grid() + 1
    return filtered(dry, (hz < top_hz) / np.sqrt(1 + (30 / hz) ** 8))


dry = scene()
out = record(dry)
dump_mix(out)
```